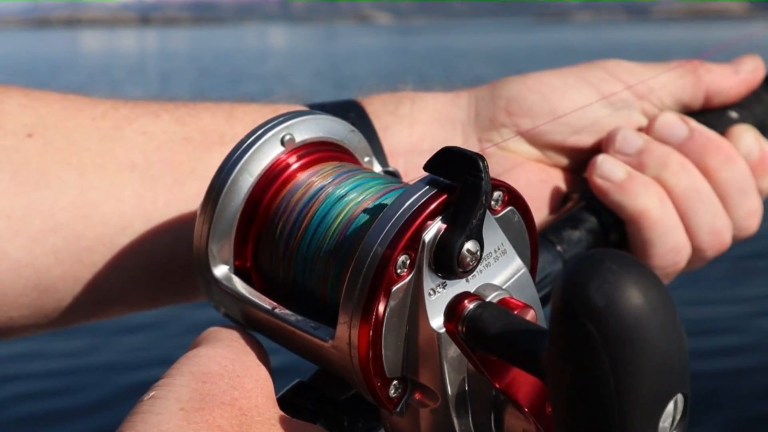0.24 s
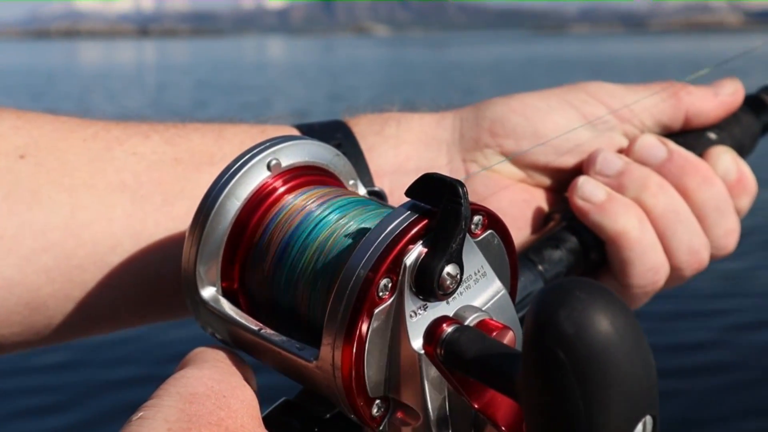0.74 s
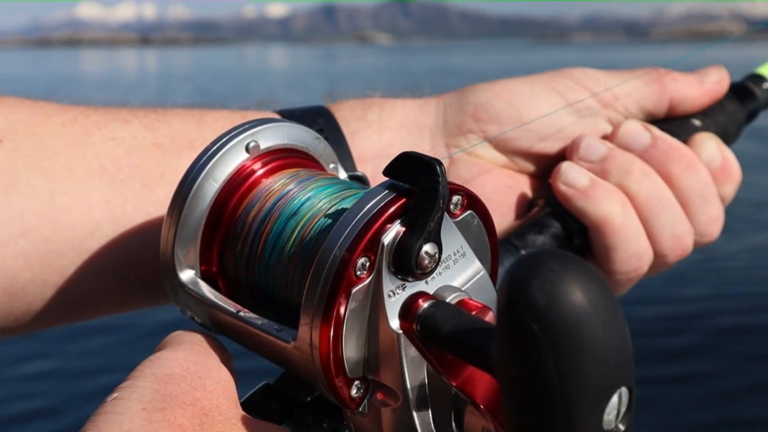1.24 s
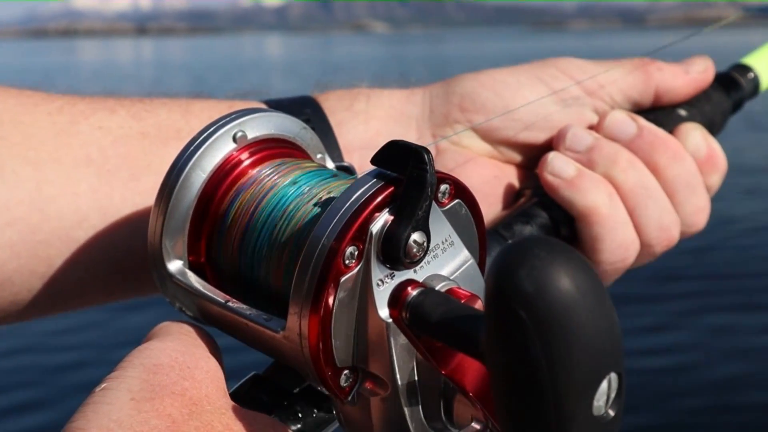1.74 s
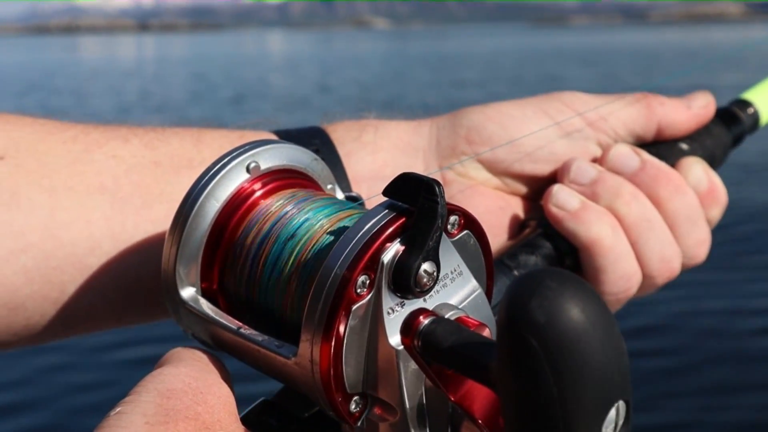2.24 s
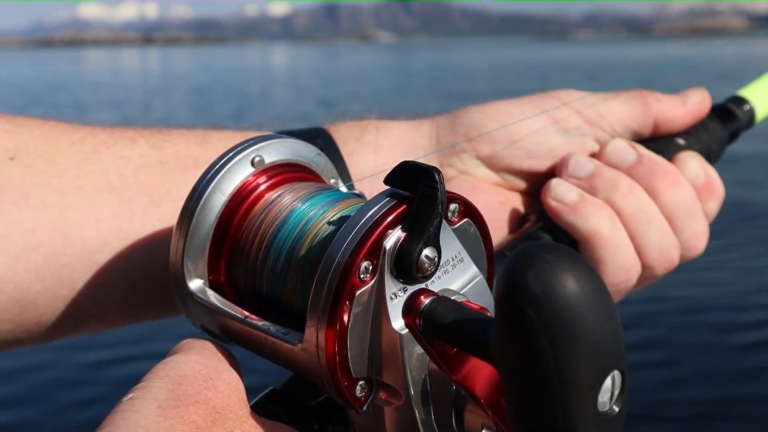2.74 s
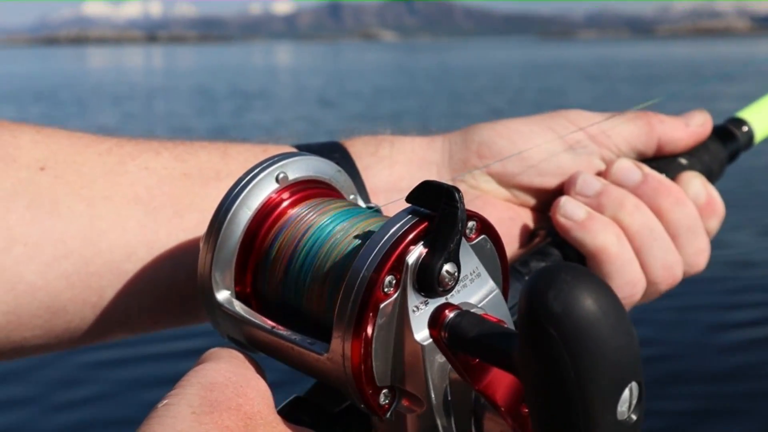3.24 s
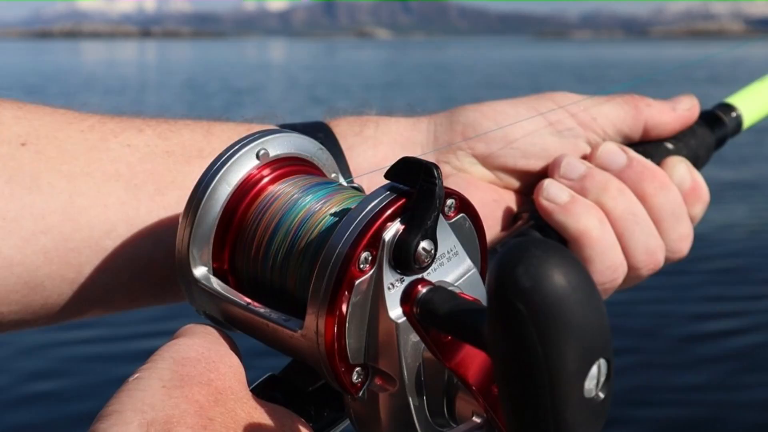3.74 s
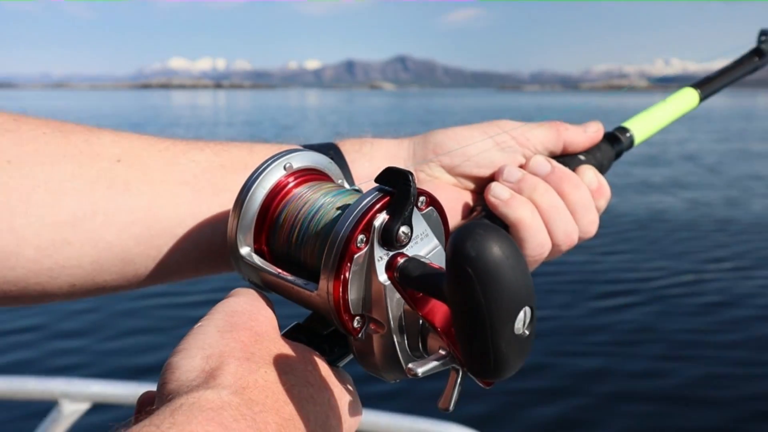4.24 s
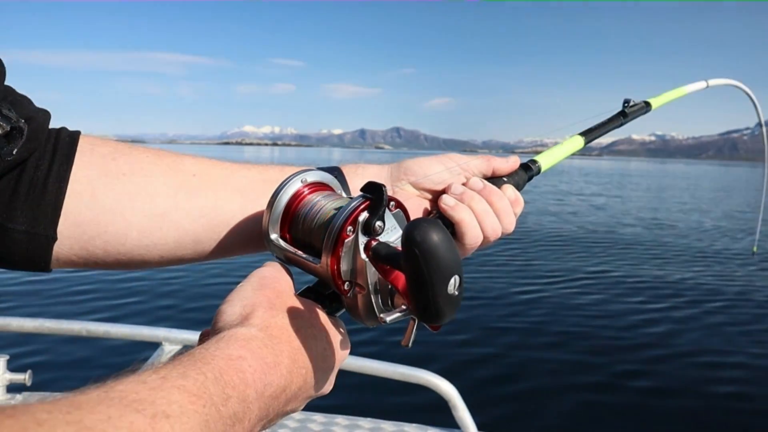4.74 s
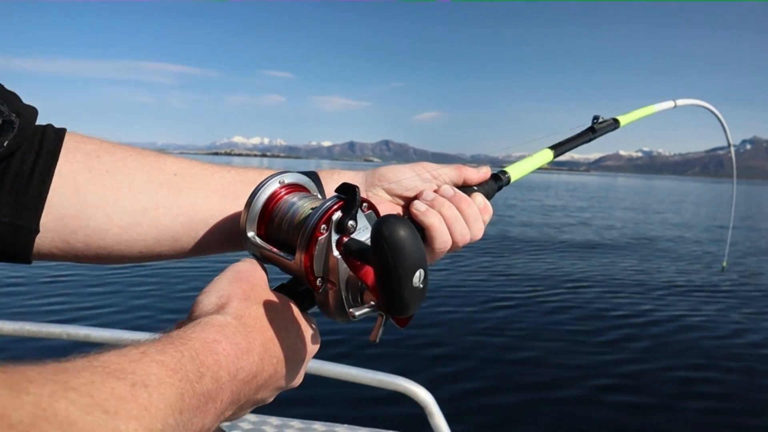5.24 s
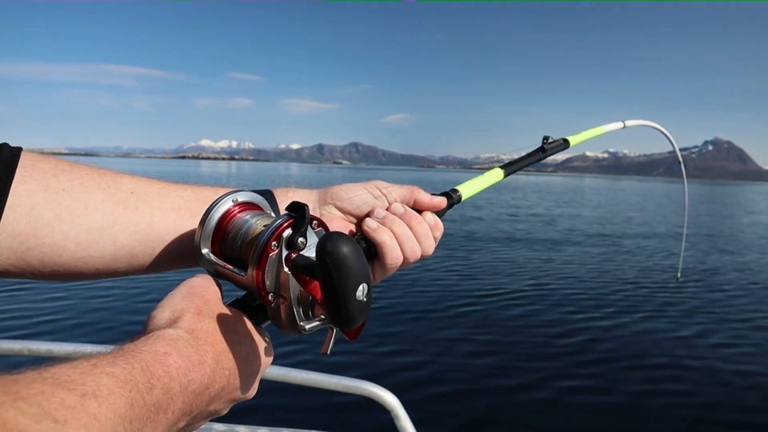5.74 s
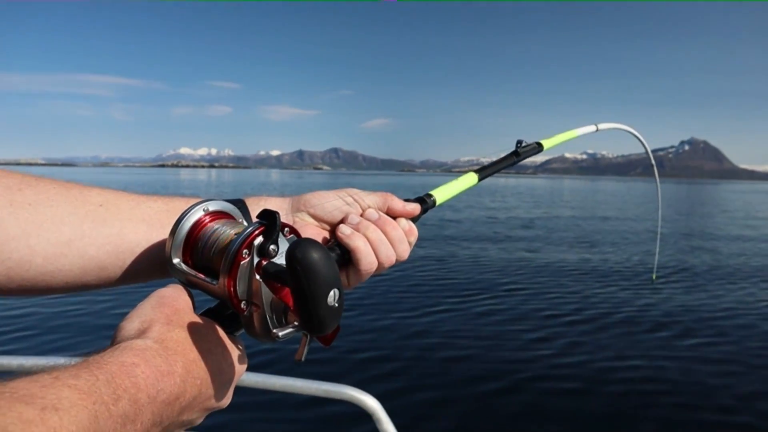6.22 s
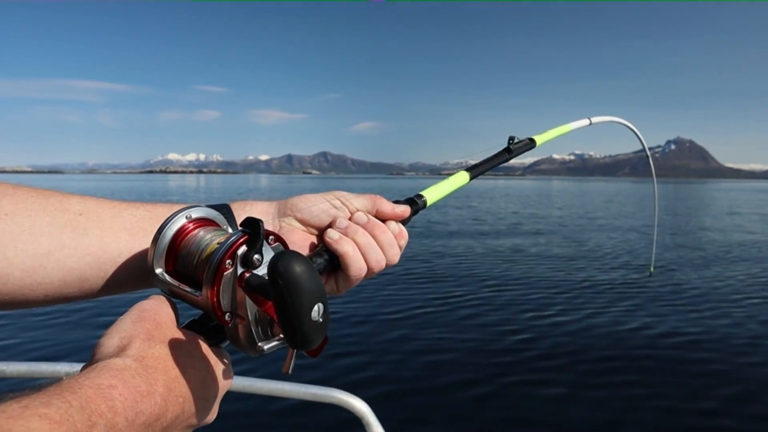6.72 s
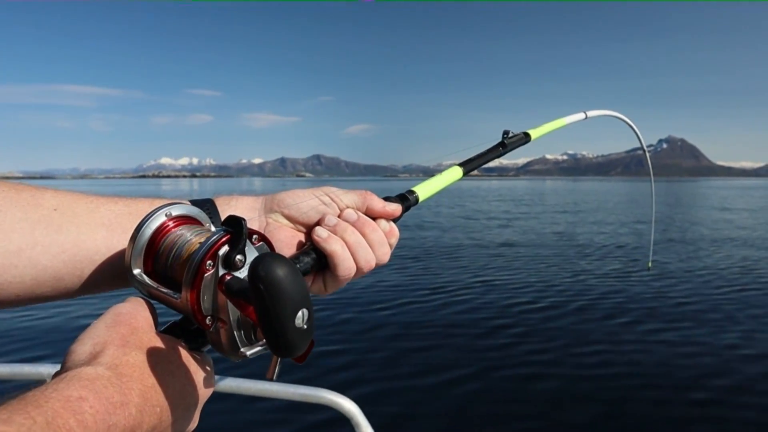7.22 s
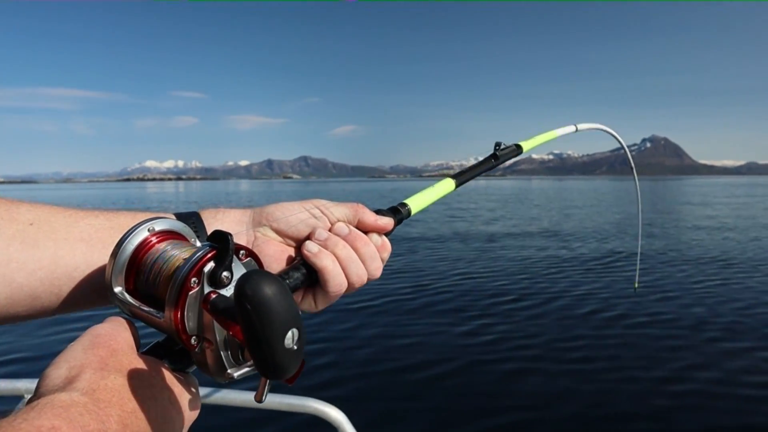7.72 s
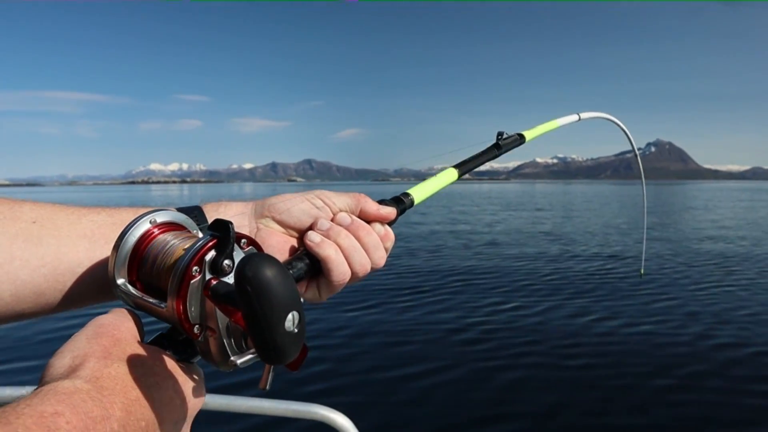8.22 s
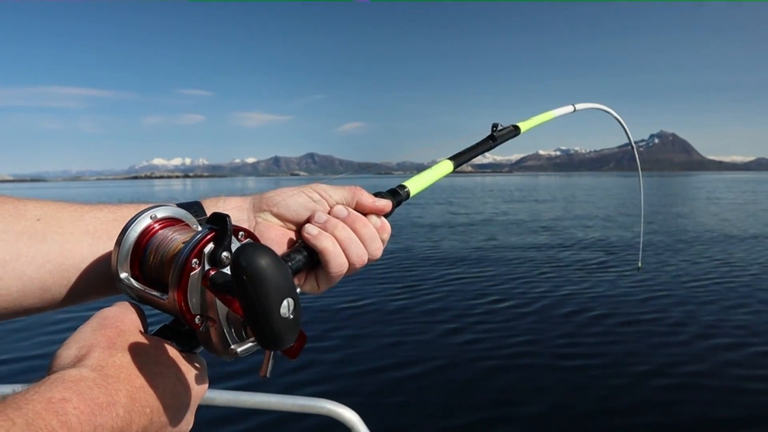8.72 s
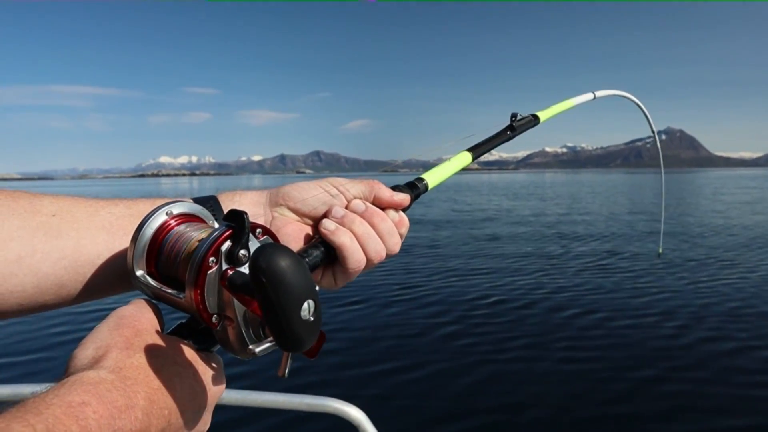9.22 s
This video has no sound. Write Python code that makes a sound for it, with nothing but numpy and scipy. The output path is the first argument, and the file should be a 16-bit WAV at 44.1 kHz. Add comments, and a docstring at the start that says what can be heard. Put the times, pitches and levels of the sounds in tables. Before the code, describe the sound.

Close to the microphone on a boat, a fishing reel's drag gives a bright, dense mechanical buzz as line is stripped in three spurts. Each run wavers with small surges and gradually loses speed, and between the runs the ratchet drops to individual metallic clacks. Quiet air and water rumble and occasional dull hull thuds lie far below the reel.

```python
"""On a boat, close to a metal reel, in stereo: a big fish strips line. The spool turns a sixteen-tooth
wheel past a sprung clicker tongue: a buzz in each of three runs, single clacks when the drag nearly
holds. Each clack rings the reel's plates, frame and spool and is answered by the hull. Underneath lie a
low rumble of air and water, a few dull bumps, a faint hum and one soft rub on the rod."""
import sys
import numpy as np
from scipy import signal
from scipy.fft import rfft, irfft, next_fast_len
from scipy.io import wavfile
from scipy.ndimage import map_coordinates

SR = 44100
rng = np.random.default_rng(int(sys.argv[2]) if len(sys.argv) > 2 else 0)


def int16_out(signal):
    """Quantize to a 16-bit WAV file."""
    q = np.round(np.clip(np.atleast_2d(signal).T, -1, 1) * 32767)
    wavfile.write(sys.argv[1], SR, q.astype(np.int16))


N = 417627
TIME = np.arange(N) / SR


def amp(db):
    """Gain of a level in dB."""
    return 10 ** (np.asarray(db) / 20)

def along(points, hz):
    """Read (f/Hz, value) points on a log frequency axis."""
    f, v = np.transpose(points)
    return np.interp(np.log(hz + 1), np.log(f + 1), v)

def wobble(rate):
    """A smooth random curve, rate knots a second."""
    return map_coordinates(rng.standard_normal(int(N * rate / SR) + 4), [TIME * rate])

def swell(s, half_s):
    """A bell-shaped rise and fall round the time s."""
    return np.exp(-((TIME - s) / half_s) ** 2)

def filtered(x, response):
    """x through a complex frequency response."""
    m = next_fast_len(N + SR // 2)
    return irfft(rfft(x, m) * response(np.fft.rfftfreq(m, 1 / SR)), m)[..., :N]

def resonate(x, modes, low_cut_hz=0, order=0):
    """x through resonances (f/Hz, width/Hz, level/dB) of alternating sign, with an optional low cut."""
    def response(f):
        peaks = sum((-1) ** k * amp(db) * 1j * f * width / (hz * hz - f * f + 1j * f * width)
                    for k, (hz, width, db) in enumerate(modes))
        return peaks * (1j * f / (low_cut_hz + 1j * f)) ** order if order else peaks
    return filtered(x, response)

def noise(spectrum):
    """Two unrelated noises of this colour, rms 1."""
    pair = filtered(rng.standard_normal((2, N)), lambda f: amp(along(spectrum, f)))
    return pair / np.sqrt(np.mean(pair ** 2))

def stereo(pair, likeness):
    """Two unrelated signals mixed to left and right by (f/Hz, likeness 0-1) points."""
    angle = lambda f: np.arccos(along(likeness, f)) / 2
    mid, side = filtered(pair, lambda f: np.array([np.cos(angle(f)), np.sin(angle(f))]))
    return np.array([mid + side, mid - side])

def impulses(times, db):
    """One spike at each time, at its level."""
    return np.bincount(np.clip(np.round(times * SR).astype(int), 0, N - 1), amp(db), N)


# the spool's steady speed, one list for each run of the fish: t/s, speed/(teeth/s)
RUN_SPEEDS = [
    [(0.0013, 110.05), (0.282, 102.87), (1.347, 40.91), (1.749, 39.57), (2.1511, 29.5)],
    [(2.5634, 37.2), (2.733, 77.09), (3.182, 111.32), (3.452, 167.75), (4.1, 140.19), (5.513, 53.14),
     (6.18, 38.41), (6.73, 31.44)],
    [(7.8519, 33.49), (7.881, 66.16), (8.236, 142.73), (8.91, 168.31), (8.91, 139.95), (9.4653, 56.11)],
]
# tail beats, each a short surge of the spool: t/s, extra speed/(teeth/s)
TAIL_BEATS = [(0.037, 16.23), (0.451, 16.26), (0.746, 12.16), (0.877, 12.07), (1.133, 19.7), (1.236, 13.98),
              (1.393, 27.74), (1.65, 11.05), (2.084, 7.14), (2.775, 46.49), (3.062, 83.58), (3.312, 80.85),
              (3.62, 34.83), (3.835, 14.79), (4.018, 14.24), (4.244, 10.09), (4.47, 11.02), (4.576, 13.53),
              (4.773, 12.19), (4.926, 11.28), (5.049, 12.65), (5.343, 11.4), (5.479, 16.48), (5.752, 20.06),
              (6.007, 29.41), (6.326, 17.46), (7.943, 80.37), (8.237, 39.09), (8.556, 32.34),
              (8.858, 27.68), (9.159, 34.83), (9.25, 43.98), (9.428, 51.76)]
# single clacks while the drag nearly holds: t/s, level/dB, tone colour of each clack (0-1)
SINGLE_CLACKS = [(2.1834, -21, 0), (2.2194, -21, 0), (2.2616, -20.5, 0), (2.3037, -19.5, 0),
                 (2.3504, -20.5, 0), (2.4214, -18.5, 0.1), (2.4659, -18.5, 0.06), (2.5042, -20, 0.1),
                 (2.5346, -19.5, 0), (6.7641, -21.5, 0), (6.8139, -19, 0.8), (6.8863, -21, 0.8),
                 (6.9709, -19, 0.93), (7.0493, -19, 0.8), (7.1367, -20.5, 0.8), (7.2217, -19.5, 0.25),
                 (7.3132, -19, 0.73), (7.4397, -19.5, 0.24), (7.5348, -17, 0.8), (7.6273, -17.5, 0.84),
                 (7.7356, -16, 0.76), (7.7956, -19, 0.2), (7.8299, -16.5, 1)]
# the tongue's blows during the runs: t/s, level/dB, tone colour (0-1)
RUN_BLOWS = [(0, -21, 0.17), (1, -22, 0.18), (2.15, -20.5, 0), (2.7, -19.5, 0.25), (3, -20, .46),
             (3.5, -22, .42), (4.5, -22.5, .6), (5.5, -23, .65), (6.4, -22, 0.76), (6.73, -21.5, 0.81),
             (7.9, -18, 0.8), (8.2, -20, 0.84), (8.6, -21, 0.8), (9.47, -21.5, 0.87)]

def tongue_blows(wheel_teeth=16, off_centre_teeth=.07, surge_s=.05, jitter_s=.00005):
    """The tongue drops once a tooth; the wheel sits off centre, so teeth come early and late each turn."""
    t = TIME[::20]
    surge = sum(extra * np.exp(-.5 * ((t - s) / surge_s) ** 2) for s, extra in TAIL_BEATS)
    place = lambda tooth: tooth - off_centre_teeth * np.sin(2 * np.pi * tooth / wheel_teeth + 2.7)
    times = np.transpose(SINGLE_CLACKS)[0]
    for run in RUN_SPEEDS:
        s, speed = np.transpose(run)
        first = np.sum(times < s[0])
        travel = np.cumsum(np.interp(t, s, speed) + surge) * t[1]
        travel = travel - np.interp(s[0], t, travel) + place(first)
        teeth = np.arange(first, round(np.interp(s[-1], t, travel)) + 1)
        times = np.append(times, np.interp(place(teeth), travel, t))
    times = np.sort(times) + jitter_s * rng.standard_normal(len(times))
    s, blow_db, colour = np.transpose(sorted(RUN_BLOWS + SINGLE_CLACKS))
    db = np.interp(times, s, blow_db) + 0.89 * rng.standard_normal(len(times))
    return times, db, np.interp(TIME, s, colour)

def bursts(times, db, carry, layers, lead_samples=22):
    """Two strands of noise bursts, each starting just before its blow and keeping a share of the last."""
    t = np.arange(1024)[:, None] / SR
    delay_s, rise_s, t60, layer_db = np.transpose(layers)
    age = np.maximum(t - delay_s, 0)
    power = ((1 - np.exp(-age / rise_s)) ** 2 * amp(layer_db - 60 * age / t60)) ** 2
    fresh = rng.standard_normal((len(times), 2, len(t)))
    shapes = signal.lfilter([np.sqrt(1 - carry ** 2)], [1, -carry], fresh, axis=0)
    shapes *= np.sqrt(power.sum(axis=1))
    # the spring gives equal blows equal energy, however it is spread
    energy = np.sum(shapes ** 2, axis=(1, 2))
    shapes *= (amp(db) * np.sqrt(2 * power.sum() / energy))[:, None, None]
    at = np.clip(np.round(times * SR).astype(int)[:, None] - lead_samples + np.arange(len(t)), 0, N)
    return np.array([np.bincount(at.ravel(), shapes[:, k].ravel(), N + 1)[:N] for k in range(2)])


# the landing and its one bounce: delay/s, rise/s, t60/s, level/dB
LANDING_AND_BOUNCE = [(0, 0.00037, 0.014, 16.5), (.0062, 0.00046, 0.014, 1.5)]
# firm contacts within a landing: delay/s, scatter/s, level/dB
FIRM_CONTACTS = [(.0001, .00002, 26), (.0009, .00008, 25)]

def tongue_rattle(times, db):
    """The tongue rattles on the next tooth; firm contacts keep their colour from click to click."""
    rattle = bursts(times, db, carry=.85, layers=LANDING_AND_BOUNCE)
    for delay_s, scatter_s, contact_db in FIRM_CONTACTS:
        contact_times = times + delay_s + scatter_s * rng.standard_normal(len(times))
        rattle[0] += impulses(contact_times, db + contact_db)
    return rattle

def tongue_tick(times, db):
    """The sharpest touch carries the top of the treble."""
    touch = bursts(times, db, carry=0.1, layers=[(.0005, 0.000078, 0.006, 12.1)])
    return resonate(touch, [(10900, 5700, 0)])


# tongue and side plates: f/Hz, width/Hz, level/dB at tone colour 0, 0.5 and 1
PLATE_MODES = [(2945, 450, -8, -3, -20.5), (3984, 365, -4.5, -0.5, 0.5), (4415, 260, -0.5, -9.5, 9.5),
               (5270, 890, 0, 2, 7), (6170, 930, 0, 4, 5), (8084, 1120, 3, 2.5, 2.5),
               (9400, 1340, 4, -1.5, 1.5), (10360, 960, 1.5, -1, -4.5), (12090, 560, -5.5, -3.5, -17),
               (13200, 800, -10.5, -10.5, -26), (14400, 1400, -29, -33, -37)]

def plate_ring(rattle, colour):
    """Fast-damped metal, too small to send out low notes; three tone colours fade into each other."""
    sound = 0
    for k in range(3):
        modes = [(hz, width, levels[k]) for hz, width, *levels in PLATE_MODES]
        share = np.maximum(1 - np.abs(2 * colour - k), 0)
        sound = sound + share * resonate(rattle, modes, low_cut_hz=2600, order=2)
    return sound


# the reel's frame: f/Hz, width/Hz, level/dB
FRAME_MODES = [(345, 54, -10), (568, 106, 4), (892, 350, 1), (1224, 105, 5), (1710, 760, 1.5),
               (2086, 984, 4), (2600, 760, -0.5), (2984, 133, -19.5)]

def frame_knock(times, db, rattle):
    """Like knocks from tooth to tooth give the buzz its pitch; the rattle shakes the upper modes."""
    push = impulses(times, db) * amp(rng.standard_normal(N))
    knock = amp(19.5) * resonate(push, FRAME_MODES, low_cut_hz=300, order=2)
    shake = amp(-2) * resonate(rattle, FRAME_MODES, low_cut_hz=1500, order=4)
    return knock + shake


# the long-ringing spool: f/Hz, width/Hz
SPOOL_MODES = [(1725, 40), (2062, 22), (3900, 300)]
# gain of each spool mode: level/dB
SPOOL_GAINS = [27.5, 33.5, 29]
# how freely the drag lets it ring: t/s, level/dB of the two low modes, level/dB of the high mode
SPOOL_FREEDOM = [(0, 2, -11), (1, 3.5, -4), (2.7, 1, -6), (3.5, -7, 5.5), (4.2, -4.5, 3), (5.6, 2, -4.5),
                 (6.6, 3.5, -2), (6.9, -6, -8), (7.7, -23, -2), (7.8, 5, -0.5), (8.5, -2, -1.5),
                 (9.47, 3, -2.5)]

def spool_ring(times, db, scatter_db=2):
    """Each blow rings each spool mode a little differently; the drag mutes them."""
    s, low_db, high_db = np.transpose(SPOOL_FREEDOM)
    free_db = np.array([np.interp(times, s, level) for level in (low_db, low_db, high_db)]).T
    strike_db = db[:, None] + SPOOL_GAINS + free_db + scatter_db * rng.standard_normal(free_db.shape)
    return sum((-1) ** k * resonate(impulses(times, strike_db[:, k]), [(hz, width, 0)])
               for k, (hz, width) in enumerate(SPOOL_MODES))

def frame_whirr(times, db, db_per_octave=3.5):
    """One frame mode sings out as the spool speeds up."""
    octaves = -np.log2(100 * np.gradient(times))  # above 100 teeth a second
    return resonate(impulses(times, db + db_per_octave * octaves), [(910, 117, 16.7)])


# colour of the hull's answer: f/Hz, level/dB
HULL_COLOUR = [(500, -28), (900, -14), (2000, -9.5), (3000, -15), (5000, -11), (8000, -13), (11000, -21),
               (16000, -25)]

def hull_answer(times, db, delay_s=0.00059, rise_s=0.00033, t60=0.06):
    """The hull returns a short diffuse tail after each blow; powers add where tails overlap."""
    age = np.maximum(np.arange(SR // 8) / SR - delay_s, 0)
    envelope = (1 - np.exp(-age / rise_s)) ** 2 * amp(-60 * age / t60)
    power = np.abs(signal.fftconvolve(impulses(times, db) ** 2, envelope ** 2)[:N])
    tails = np.sqrt(power) * rng.standard_normal((2, N))
    answer = amp(7) * filtered(tails, lambda f: amp(along(HULL_COLOUR, f)))
    return stereo(answer, [(1200, 1.0), (4000, 0.68)])


# the rattling metal across the microphone pair: f/Hz, likeness (0-1)
METAL_LIKENESS = [(1000, 1), (2000, 0.85), (4000, 0.58), (8000, 0.69), (12000, 0.52), (16000, 0.43)]
# where the reel's modes cancel: f/Hz, width/Hz
MODE_DIPS = [(3400, 100), (4350, 590), (7000, 430), (9300, 190), (11250, 310)]

def reel(dip_depth=.4):
    """The close sound: the tongue's blows drive every part of the reel, with the hull just behind."""
    times, db, colour = tongue_blows()
    rattle = stereo(tongue_rattle(times, db), METAL_LIKENESS)
    tick = stereo(tongue_tick(times, db), METAL_LIKENESS)
    metal = tick + plate_ring(rattle, colour) + frame_knock(times, db, rattle)
    metal += spool_ring(times, db) + frame_whirr(times, db)
    for hz, width in MODE_DIPS:
        metal -= dip_depth * resonate(metal, [(hz, width, 0)])
    return metal + hull_answer(times, db)


# left over right at the microphone: f/Hz, level/dB
LEFT_BIAS = [(300, 1.5), (700, 2.8), (1200, .6), (2500, 1.2), (13000, 2.4)]
# left behind right: f/Hz, phase/rad
LEFT_LAG = [(400, 0), (620, .65), (830, .6), (1100, 0), (2500, .05), (3500, .35), (16000, .3)]
# the reel drifts left and back: t/s, level/dB left over right
REEL_DRIFT = [(0, -0.5), (6.3, -0.3), (7.2, 3), (7.9, 1), (9.47, 0.2)]

def at_microphone(sound):
    """The reel reaches the two sides at slightly different levels and phases."""
    sides = np.array([[.5], [-.5]])
    response = lambda f: amp(sides * along(LEFT_BIAS, f)) * np.exp(-1j * sides * along(LEFT_LAG, f))
    return filtered(sound, response) * amp(sides * np.interp(TIME, *np.transpose(REEL_DRIFT)))


# colour of the low rumble: f/Hz, level/dB
LOW_COLOUR = [(15, -18), (30, -5.5), (60, -7.5), (90, -11), (200, -42)]
# its course: t/s, level/dB
LOW_LEVELS = [(0.0, -63.5), (0.34, -59.5), (2.14, -56), (2.19, -53), (4.48, -56), (4.69, -51), (4.91, -59),
              (7.65, -56.5), (8.7, -70), (9.47, -58)]
# colour of the wash above it: f/Hz, level/dB
WASH_COLOUR = [(50, -47), (95, 5.5), (130, 1), (200, -2), (300, -6), (450, -10), (1000, -29), (2000, -69)]

def rumble(wash_db=-59.5, slosh_db=5.5, slosh_half_s=0.088):
    """Air and water all round the boat, in slow lumps; the water sloshes at each bump."""
    low = noise(LOW_COLOUR) * amp(np.interp(TIME, *np.transpose(LOW_LEVELS)) + 2.5 * wobble(6.5))
    slosh = slosh_db * sum(swell(s, slosh_half_s) for s, *_ in HULL_BUMPS)
    wash = noise(WASH_COLOUR) * amp(wash_db + slosh + 2.1 * wobble(5) + 1.9 * wobble(13))
    return low + wash


# colour of the hiss: f/Hz, level/dB
HISS_COLOUR = [(300, -6), (700, 10.5), (2000, 4), (6000, -15), (16000, -34)]

def hiss():
    """A faint steady hiss, far back."""
    return amp(-65) * noise(HISS_COLOUR)


# dull bumps, dead centre: t/s, peak level/dB, f/Hz, length/s
HULL_BUMPS = [(2.11, -52, 166, 0.055), (3.42, -36, 165, .035), (3.863, -44, 129, 0.05),
              (4.233, -48, 149, .04), (4.66, -32.5, 158.6, 0.015), (6.25, -55, 99, 0.068),
              (9.325, -43.5, 128, 0.042)]

def bumps():
    """Soft low thuds swell and fade through the hull."""
    return sum(amp(db) * swell(s, .5 * length) * np.sin(2 * np.pi * hz * TIME)
               for s, db, hz, length in HULL_BUMPS)

def hum(at_s=7.35, half_s=0.44, db=-53.5, hz=129):
    """A faint wavering tone comes and goes."""
    envelope = amp(db + 1.5 * wobble(14)) * swell(at_s, half_s)
    pitch = hz + 3 * wobble(10)
    return envelope * np.sin(2 * np.pi * np.cumsum(pitch) / SR)


# colour of the rub: f/Hz, level/dB
RUB_COLOUR = [(100, -22), (200, 6.5), (320, -2), (450, -17), (720, -2), (1100, -45)]

def rod_rub(at_s=7.42, half_s=0.047, db=-47):
    """One soft rub on the rod: a brief swell of low noise."""
    return amp(db) * noise(RUB_COLOUR) * swell(at_s, half_s)

def scene():
    """The reel in front, over a bed whose low end is almost the same on both sides."""
    front = at_microphone(reel())
    bed_likeness = [(30, 0.97), (90, 0.99), (180, 0.96), (400, 0.89), (3000, 0.23)]
    bed = rumble() + rod_rub()
    centre = hum() + bumps()
    return front + centre + stereo(bed + hiss(), bed_likeness)

def record(dry):
    """Nothing sounds above 16.2 kHz."""
    return filtered(dry, lambda hz: np.clip((16200 - hz) / 500, 0, 1) ** 2)


dry = scene()
out = record(dry)
int16_out(out)
```